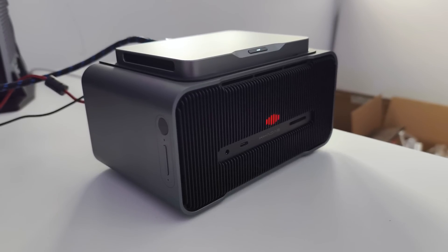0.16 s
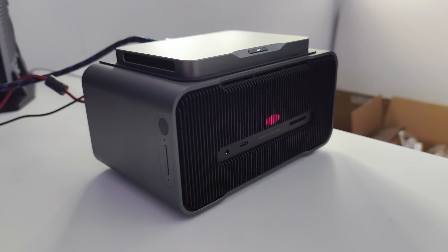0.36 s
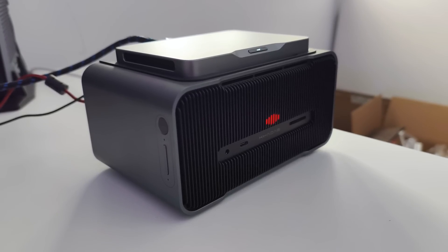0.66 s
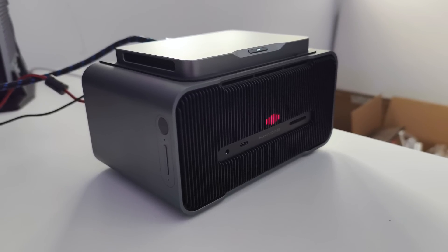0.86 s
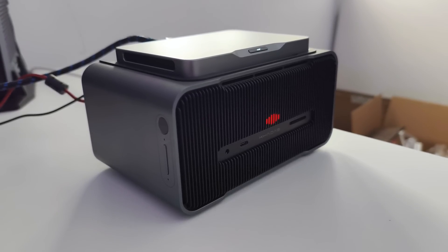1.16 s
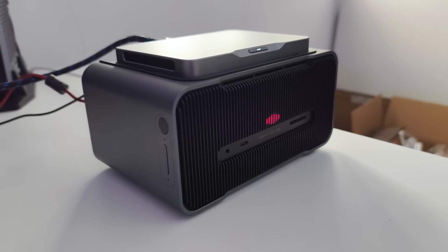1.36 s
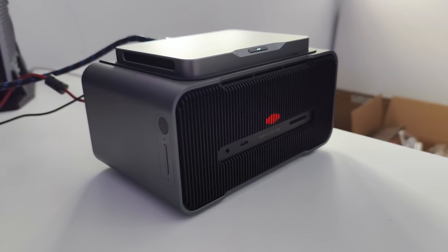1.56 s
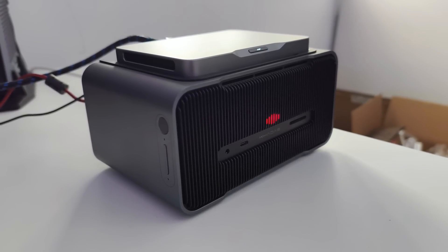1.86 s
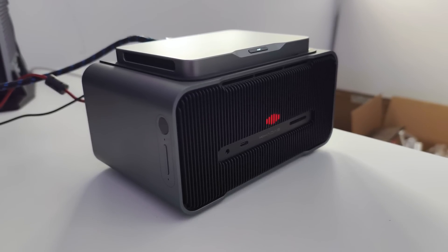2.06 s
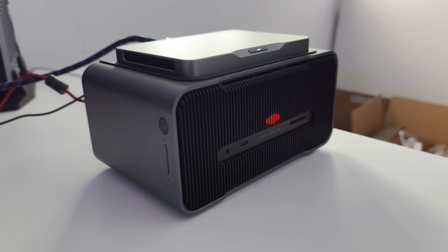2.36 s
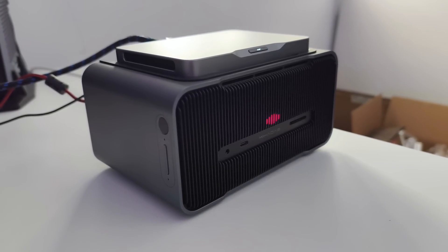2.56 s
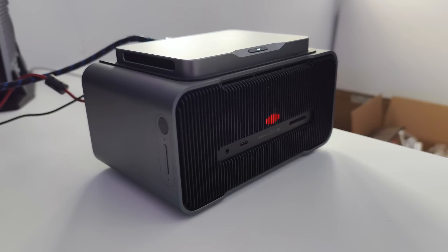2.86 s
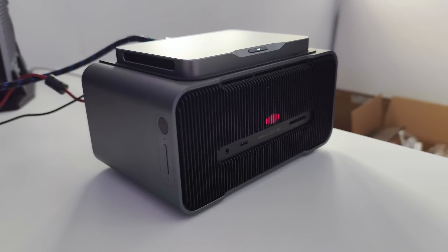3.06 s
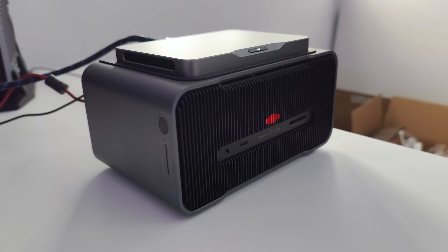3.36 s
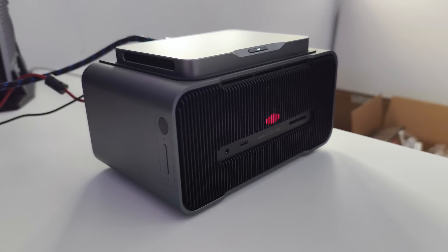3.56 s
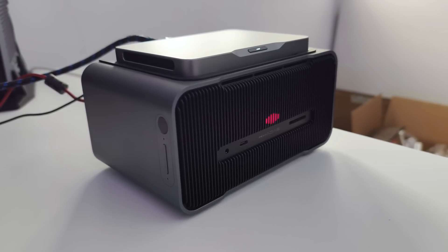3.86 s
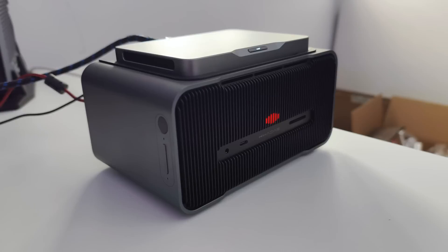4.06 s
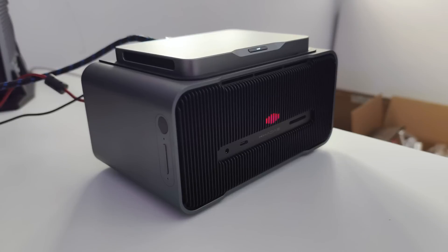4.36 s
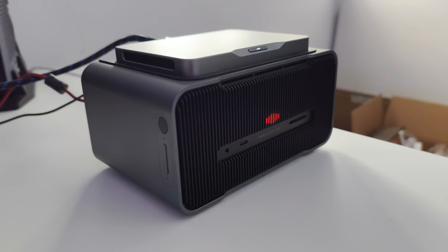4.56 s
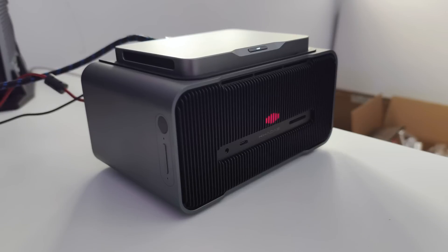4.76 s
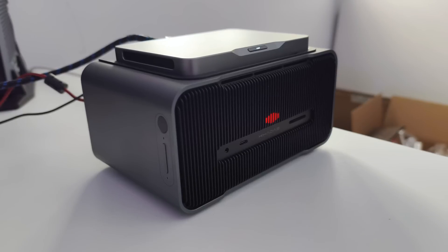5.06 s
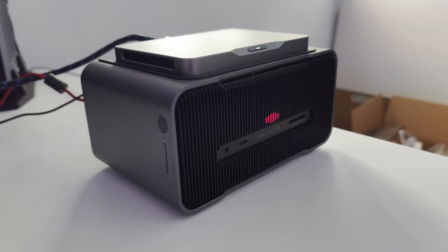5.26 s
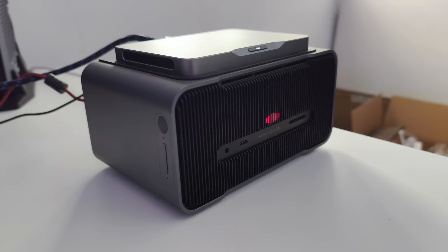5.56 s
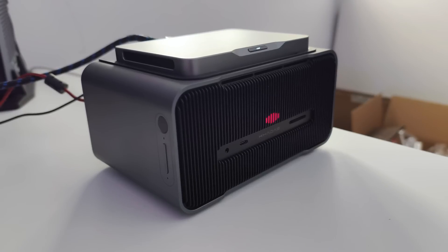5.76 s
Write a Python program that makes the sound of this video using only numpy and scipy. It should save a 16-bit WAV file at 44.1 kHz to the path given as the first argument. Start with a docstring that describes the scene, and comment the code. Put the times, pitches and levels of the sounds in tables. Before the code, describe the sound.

Cooling fans in a small computer on a desk run without pause, heard close in stereo. A broad, bright airy hiss with a hollow, resonant colour around one kilohertz dominates, with a soft high whirr inside it. Below lie a quiet rotor hum and desk rumble that briefly swell and dip. Two dull bumps, near half a second and just after five seconds, are almost buried in a room with slight reflections.

```python
"""Air rushes and hisses close to a two-port microphone: a small computer on a desk runs its cooling fans.
Shaped noise makes the air, coloured by narrow case resonances and by echoes from desk and walls.
A soft whirr of narrow noise sits in it; under it, sine tones make the rotor hum, whose deep part
swells and dips, and resonant noise makes the desk rumble. A thin, swaying sine whines on top.
Two soft filtered blows, a knock and a thud, lie nearly lost in the airflow."""
import sys
import numpy as np
from scipy import signal
from scipy.fft import rfft, irfft
from scipy.io import wavfile

SR = 44100
rng = np.random.default_rng(int(sys.argv[2]) if len(sys.argv) > 2 else 0)


def waveform_to_disk(signal):
    """Save audio, clipped to [-1, 1], as 16-bit WAV at the path in sys.argv[1]."""
    frames = np.transpose(np.atleast_2d(signal))
    scaled = np.clip(frames, -1, 1) * 32767
    samples = np.round(scaled).astype(np.int16)
    wavfile.write(sys.argv[1], SR, samples)


N = 260190
TIME = np.arange(N) / SR  # s
HZ = np.fft.rfftfreq(N, 1 / SR)

# All levels are those of the source, ahead of the microphone.
# low rush of the moving air, before the resonances: pitch_hz, left_db and right_db [dB per Hz]
AIR_RUSH = [(20.0, -87, -89), (45.0, -89, -88), (80.0, -82.5, -86), (151, -89.5, -90.5), (209, -89.5, -90),
            (324, -94, -97), (416, -92.5, -96.5), (633, -83, -86.5), (1163, -90.5, -85.5), (1403, -92, -93)]
# hiss of fins and grille, with treble notches of each port: pitch_hz, left_db and right_db [dB per Hz]
GRILLE_HISS = [(1577, -85, -87), (2126, -90.5, -94), (3240, -80, -92), (4560, -81, -89.5),
               (5360, -80.0, -91.5), (7020, -87.5, -88), (7900, -103, -88), (8720, -99.2, -88),
               (9040, -108.4, -93.5), (10880, -94, -95.5), (11400, -86.5, -110.6), (12180, -90.5, -107.4),
               (12800, -107.4, -108.8), (15700.0, -114.8, -114.6)]
# resonances of the case and the space round it: pitch_hz, half_width_hz, left_lift_db, right_lift_db
CASE_RESONANCES = [(465, 28, 2.5, 1), (562, 12, 1.5, 0), (653, 75, 2, 1), (783, 16.5, 6, 4),
                   (831, 19, 6, 3), (912, 22, 7.5, 3.5), (957.7, 35, 10.5, 8.5), (1063, 28.5, 11, 7),
                   (1126, 33.4, 11, 4.5), (1214, 18, 9, 3.5), (1288, 44, 5, 5.5), (1448, 23, 5.5, -2),
                   (1695, 25, 3.5, 3.5), (2123, 79, 5, 3.5), (2380, 170, 0, 4.5), (2573, 23, 8.5, 7),
                   (2650, 19, -0.5, -14), (2970, 56, 0.5, 9), (3300, 20, 3, 8.5), (3426, 67, 3.5, 6),
                   (4036, 200, 5.5, 5), (4547, 240, 4.5, 11), (4860, 124, 3, 3), (5070, 170, 0.5, 4.5),
                   (5560, 94, 1.5, 7.5), (6230, 28, 5, 8), (6304, 28, 6.5, 4), (6400, 35, 8.5, 5),
                   (7324, 355, 5, 7.5)]
# likeness of the air noise at the two ports: pitch_hz, coherence [0-1]
PORT_LIKENESS = [(45, 0.35), (150, 0.2), (340, 0.52), (600, 0.82), (1200, 0.6), (1350, 0.02), (1650, 0.64),
                 (2200, 0.4), (2950, 0.52), (4000, 0.82), (4800, 0.7), (5400, 0.28), (6800, 0.45),
                 (7200, 0.76), (7600, 0.5), (11500, 0.24), (15000, 0)]
# how far the left port leads the right: pitch_hz, lead_rad
PORT_LEAD = [(20, 0.1), (780, 0), (950, 0.6), (1300, -0.2), (1450, 2), (1900, 2), (2800, 0.86), (3300, 1.5),
             (3900, 0.5), (5100, 0.4), (6000, 3), (6750, 3.5), (7200, 8), (7450, 6), (7600, 8),
             (10000, 10.5), (11500, 13)]
# soft whirr in the fins: pitch_hz, width_hz, left_db, right_db [dB rms]
FIN_WHIRR = (4586, 60, -64, -64.5)
# speed of the slow rotor and tone of the fast one
SLOW_HZ, FAST_HZ = 22.74, 201.3
# tones of the slow rotor before swells and dips: multiple [of its speed], left_db, right_db
SLOW_TONES = [(1, -77, -78), (2, -55.7, -57.9), (3, -63.3, -62.3), (5, -71.5, -73.2), (11, -85.6, -89.3)]
# tones of the fast rotor: multiple [of its tone], left_db, right_db
FAST_TONES = [(1, -77, -83), (4, -71, -70), (6, -71.5, -73.5)]
# faint tones set at their own pitch, before swells and dips: a drone beside the rotors, and the slow rotor's
# tenth tone sitting a little flat: pitch_hz, left_db, right_db
DRONE_TONES = [(54.7, -70.5, -70.5), (226.1, -76, -78.5)]
# swells of the deep hum: peak_s, lift_db, rise_s, fall_s
HUM_SWELLS = [(0.41, 5.5, .05, .03), (1.285, 7.5, 0.12, .07), (1.52, 3.5, .04, 0.04), (4.98, 6, .05, .035),
              (5.06, 11, 0.034, 0.024), (5.265, 11, 0.077, 0.09)]
# dips of the deep hum: centre_s, depth_db
HUM_DIPS = [(0.81, -11), (1.42, -3), (5.135, -10), (5.395, -11)]
DIP_HALF_S = 0.032
# deep resonance of the desk: pitch_hz, width_hz, left_db, right_db [dB rms]
DESK_RESONANCE = (42.0, 1.8, -67.5, -70.5)
# a light knock and a softer thud: start_s, peak_db, upper_edge_hz
SOFT_KNOCKS = [(.536, -45.3, 260), (5.28, -49.5, 90)]


def gain_of(db):
    """Decibels to amplitude."""
    return 10 ** (np.asarray(db) / 20)


def evened(x):
    """Scales to rms 1."""
    return x / np.sqrt(np.mean(x ** 2) + 1e-20)


def in_both(left_db, right_db, x):
    """Sends one sound to both ports, each at its own level."""
    return np.outer(gain_of([left_db, right_db]), x)


def read(points):
    """Each column of a table, joined by straight lines on a log-frequency axis."""
    hz, *columns = np.transpose(sorted(map(tuple, points)))
    return np.array([np.interp(np.log(HZ + 1), np.log(hz + 1), column) for column in columns])


def white():
    """Spectrum of white noise with a power of 1 per Hz."""
    return rfft(rng.standard_normal(N)) * np.sqrt(SR / 2)


def drift(rate_hz):
    """Slow random motion of rms 1, fading out above the rate."""
    return evened(irfft(white() * (HZ > 0) / (1 + (HZ / rate_hz) ** 4), N))


def bump(s, half_s):
    """A smooth rise and fall of height 1 around a moment."""
    return np.exp(-((TIME - s) / half_s) ** 2)


def airflow(flutter_db, flutter_hz, eddy_low_hz, eddy_high_hz, count):
    """Turbulence rings the case resonances; large eddies flutter in the low middle, the hiss stays even."""
    colour_db = read(list(AIR_RUSH) + list(GRILLE_HISS))
    for hz, half_width, left_db, right_db in CASE_RESONANCES:
        peak = np.exp(-((HZ - hz) / half_width) ** 2)
        colour_db = colour_db + np.outer([left_db, right_db], peak)
    # the ports share part of their noise, the right one with a phase lag
    same = np.clip(read(PORT_LIKENESS)[0], 0, 1)
    left = white()
    right = same * left + np.sqrt(1 - same ** 2) * white()
    right = right * np.exp(-1j * read(PORT_LEAD)[0])
    spectrum = np.array([left, right]) * gain_of(colour_db)
    air = irfft(spectrum, N)
    edges = np.geomspace(eddy_low_hz, eddy_high_hz, count + 1)
    for low, high in zip(edges, edges[1:]):
        strength = evened(gain_of(flutter_db * drift(flutter_hz)))  # each eddy size has its own rhythm
        band = irfft(spectrum * (HZ >= low) * (HZ < high), N)
        air = air + band * (strength - 1)
    return air


def unsteady(x, depth_db, rate_hz):
    """The whole flow rises and falls very slightly."""
    return x * gain_of(depth_db * drift(rate_hz))


def reflections(x, wet_db, t60):
    """Echoes from desk and walls comb fine fixed ripples into the treble, different at each port."""
    tail = rng.standard_normal((2, N)) * gain_of(-60 * TIME / t60)
    tail /= np.linalg.norm(tail, axis=1, keepdims=True)
    wet = gain_of(wet_db) * HZ ** 2 / (HZ ** 2 + 1500 ** 2)  # little echo in the bass
    return irfft(rfft(x) * (1 + wet * rfft(tail)) / np.sqrt(1 + wet ** 2), N)


def whirr(sway_hz, sway_rate_hz, throb_db, throb_hz):
    """A half-formed whistle of air over the fins; its pitch sways and its strength comes and goes."""
    hz, width_hz, left_db, right_db = FIN_WHIRR
    pitch_hz = hz + sway_hz * drift(sway_rate_hz)
    turn = np.exp(2j * np.pi * np.cumsum(pitch_hz) / SR)
    fuzz = drift(width_hz / 2) + 1j * drift(width_hz / 2)  # spreads the tone into a narrow band
    throb = gain_of(throb_db * drift(throb_hz))
    return in_both(left_db, right_db, evened((turn * fuzz).real * throb))


def rotors(wander, waver_db):
    """Tones of unbalance and passing blades; they share a slightly wandering speed."""
    clock = TIME + wander * np.cumsum(drift(2.4)) / SR  # wander is a share of the speed
    tones = list(DRONE_TONES)
    for speed_hz, orders in ((SLOW_HZ, SLOW_TONES), (FAST_HZ, FAST_TONES)):
        for multiple, left_db, right_db in orders:
            tones.append((multiple * speed_hz, left_db, right_db))
    out = np.zeros((2, N))
    for hz, left_db, right_db in tones:
        tone = np.sqrt(2) * np.sin(2 * np.pi * (hz * clock + rng.random()))
        out += in_both(left_db, right_db, tone * gain_of(waver_db * drift(3.0)))
    return out


def swelling(x, corner_hz):
    """The deep part of the hum swells and dips briefly, each swell with its own rise and fall."""
    lift_db = np.zeros(N)
    for s, db, rise_s, fall_s in HUM_SWELLS:
        lift_db += db * bump(s, np.where(TIME < s, rise_s, fall_s))
    for s, db in HUM_DIPS:
        lift_db += db * bump(s, DIP_HALF_S)
    bass = irfft(rfft(x) / (1 + (HZ / corner_hz) ** 8), N)
    return x + bass * (gain_of(lift_db) - 1)


def rumble():
    """The running fans shake the desk, which booms unevenly at its deep resonance."""
    hz, width_hz, left_db, right_db = DESK_RESONANCE
    ring = 1j * HZ * width_hz / (hz ** 2 - HZ ** 2 + 1j * HZ * width_hz)
    boom = irfft(white() * ring / (1 + (HZ / 90) ** 4), N)
    return in_both(left_db, right_db, evened(boom))


def whine(hz, sway_hz, sway_rate_hz, left_db, right_db):
    """A thin whine from the electronics, even in level and slightly unsteady in pitch."""
    pitch_hz = hz + sway_hz * drift(sway_rate_hz)
    tone = np.sin(2 * np.pi * np.cumsum(pitch_hz) / SR)
    return in_both(left_db, right_db, evened(tone))


def knock(s, peak_db, high_hz, low_hz, tail_db, t60):
    """One dull push with a faint, loose tail, nearly lost in the airflow."""
    age = TIME - s
    tail = rng.standard_normal(N) * (age > 0) * gain_of(-60 * abs(age) / t60)
    blow = signal.unit_impulse(N, round(s * SR)) + gain_of(tail_db) * tail / np.linalg.norm(tail)
    band = signal.butter(2, [low_hz, high_hz], "band", fs=SR, output="sos")
    dull = signal.sosfilt(band, blow)
    return gain_of(peak_db) * dull / abs(dull).max()


def scene():
    """Air, whirr, rotors and whine of the computer, the rumble of the desk, and two soft knocks."""
    air = airflow(flutter_db=1.35, flutter_hz=14, eddy_low_hz=280, eddy_high_hz=2300, count=6)
    air = unsteady(air, depth_db=0.35, rate_hz=15.0)
    air = reflections(air, wet_db=-12.5, t60=0.25)
    fins = whirr(sway_hz=14, sway_rate_hz=4, throb_db=1.5, throb_hz=8)
    hum = swelling(rotors(wander=0.0006, waver_db=0.6), corner_hz=70)
    thin = whine(hz=13985, sway_hz=4, sway_rate_hz=20, left_db=-93, right_db=-85.0)
    taps = sum(knock(*row, low_hz=45, tail_db=-8, t60=0.15) for row in SOFT_KNOCKS)
    return air + fins + hum + rumble() + thin + taps


def record(dry):
    """The microphone sheds the deepest bass; a steep low-pass then ends the treble."""
    thinned = irfft(rfft(dry) * HZ ** 3 / np.hypot(HZ ** 3, 19 ** 3), N)
    low_pass = signal.firwin(1023, 15720, window=("kaiser", 9), fs=SR)  # edge in Hz
    return signal.oaconvolve(thinned, low_pass[None], "same")


dry = scene()
out = record(dry)
waveform_to_disk(out)
```